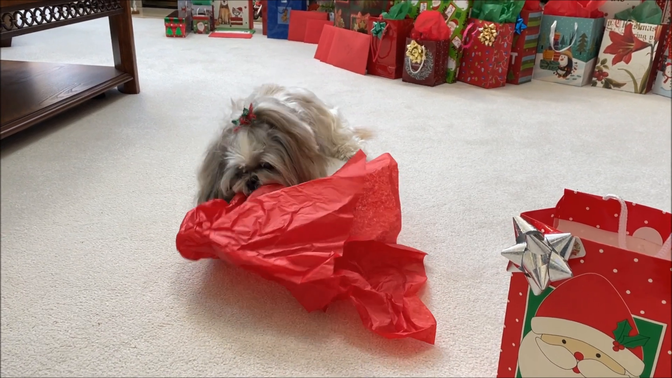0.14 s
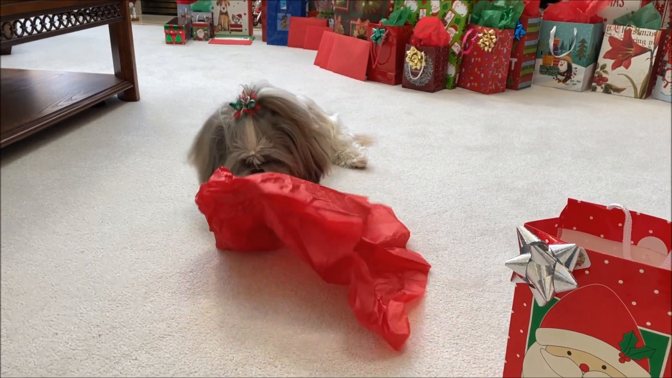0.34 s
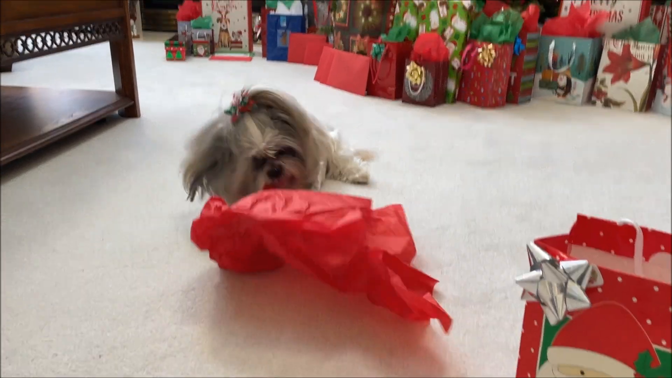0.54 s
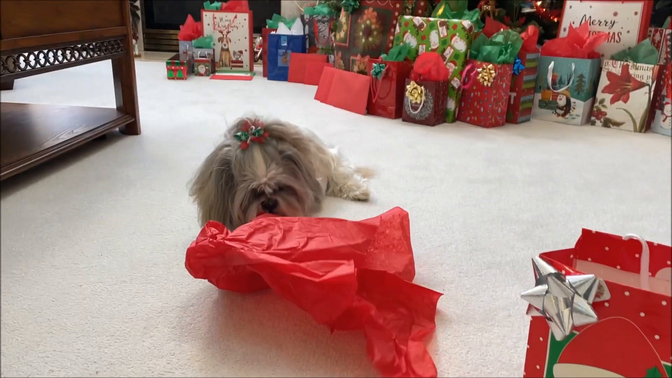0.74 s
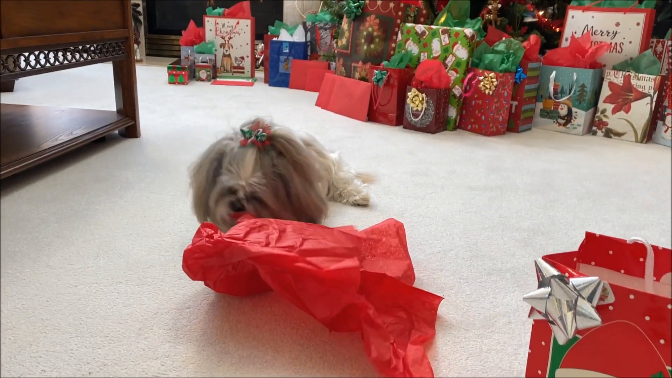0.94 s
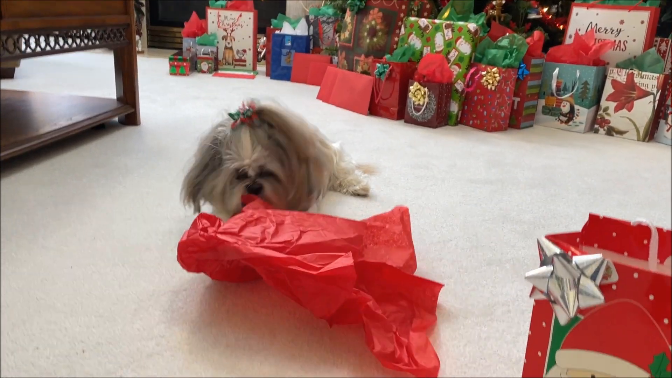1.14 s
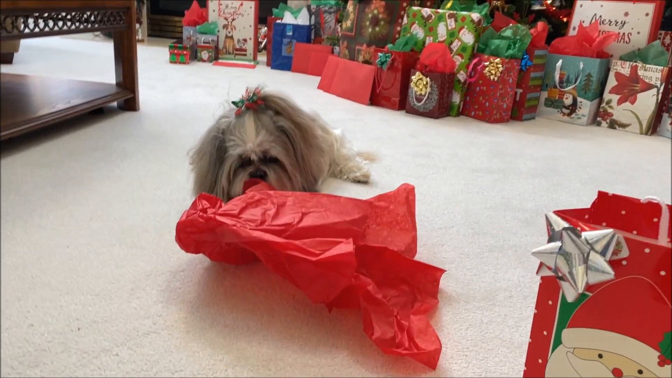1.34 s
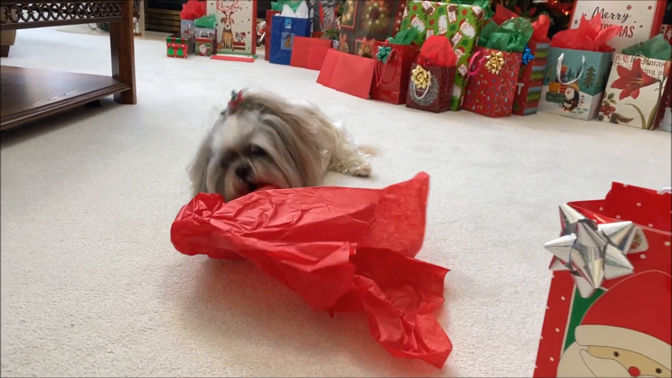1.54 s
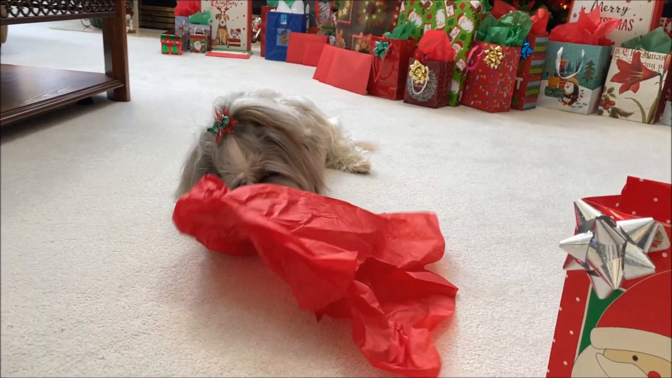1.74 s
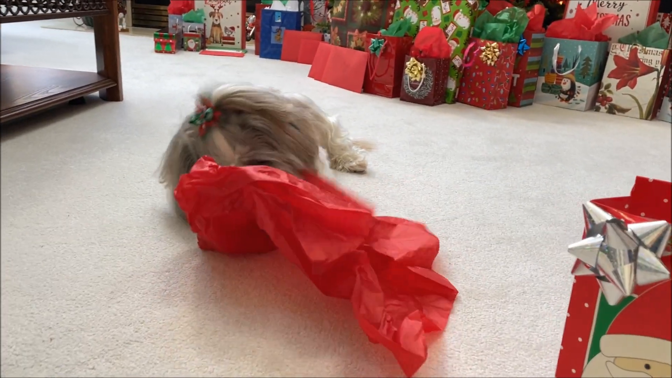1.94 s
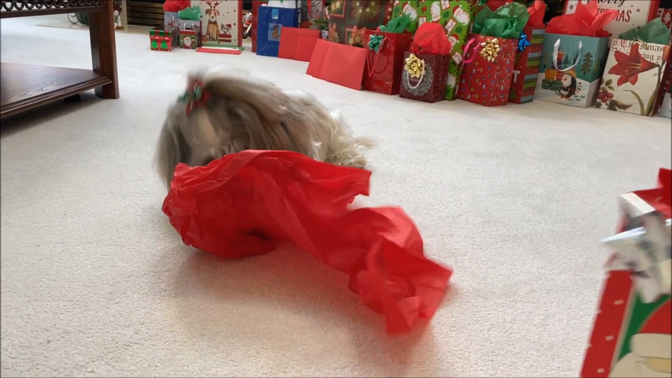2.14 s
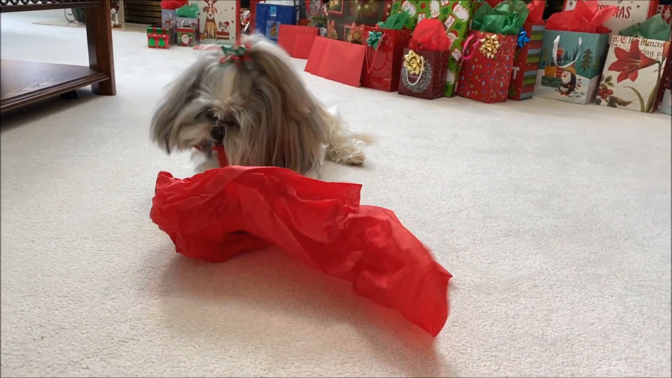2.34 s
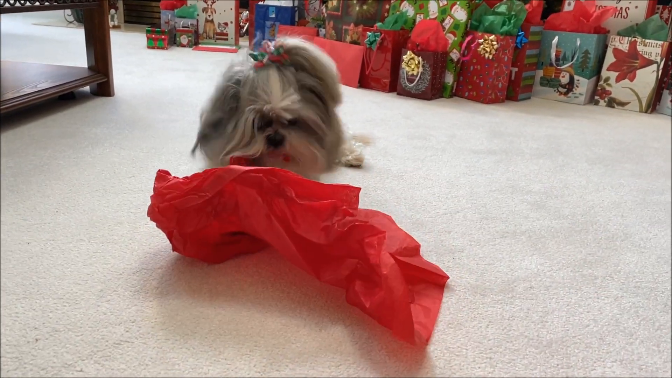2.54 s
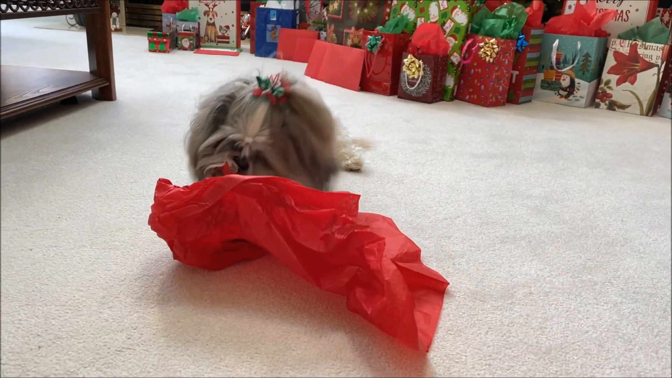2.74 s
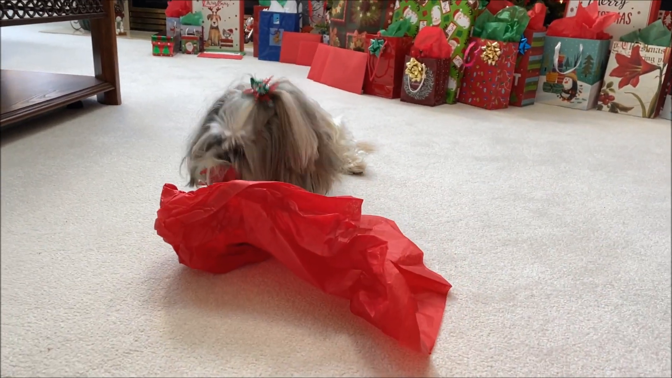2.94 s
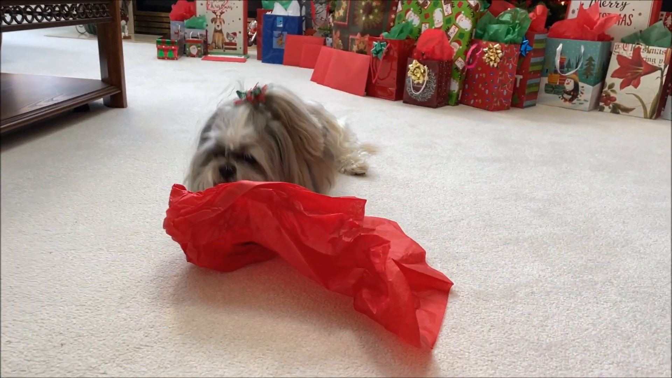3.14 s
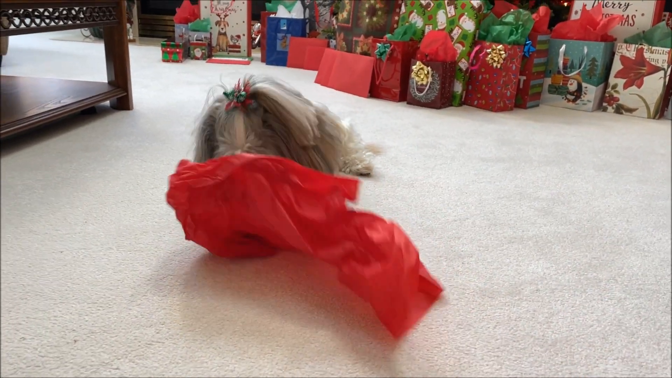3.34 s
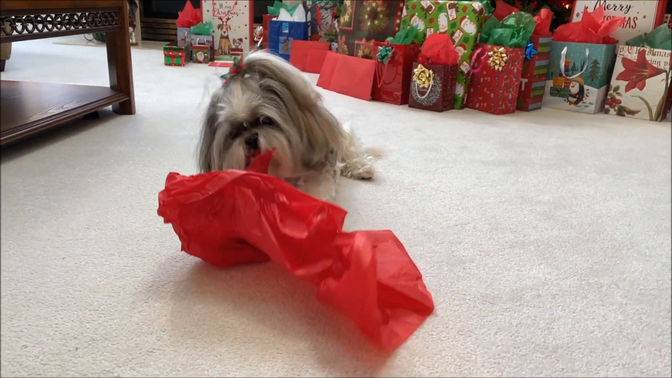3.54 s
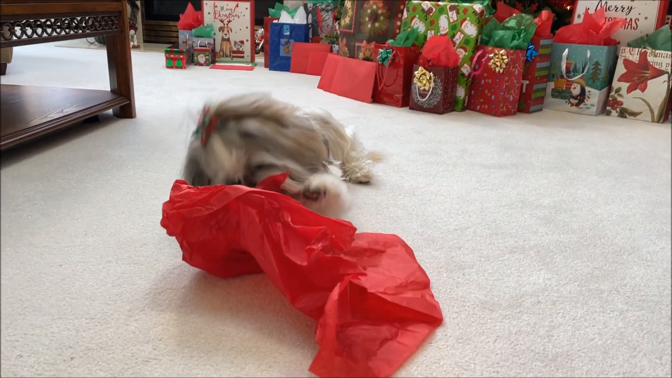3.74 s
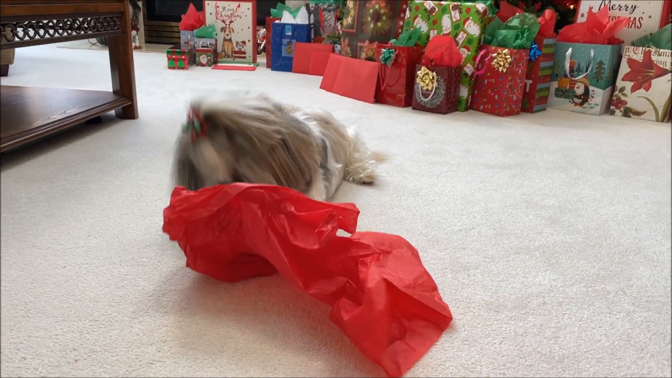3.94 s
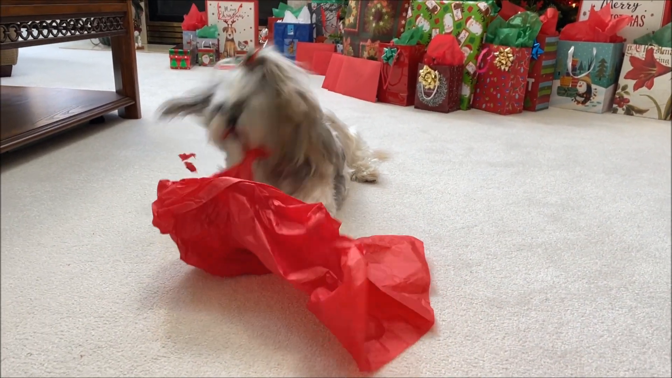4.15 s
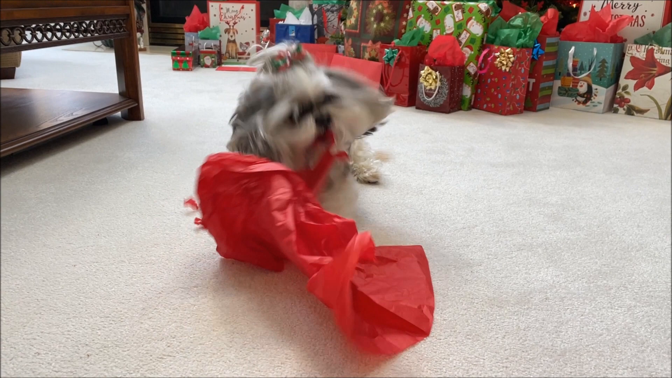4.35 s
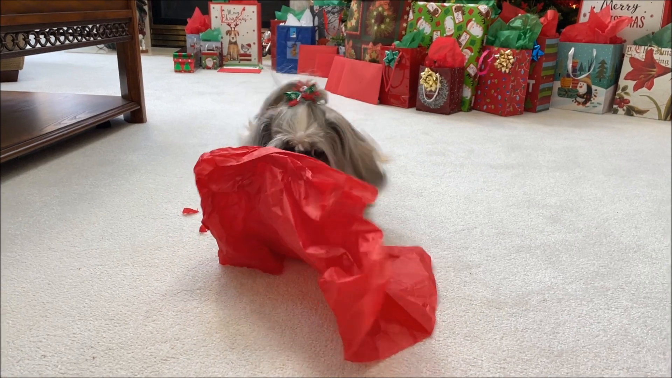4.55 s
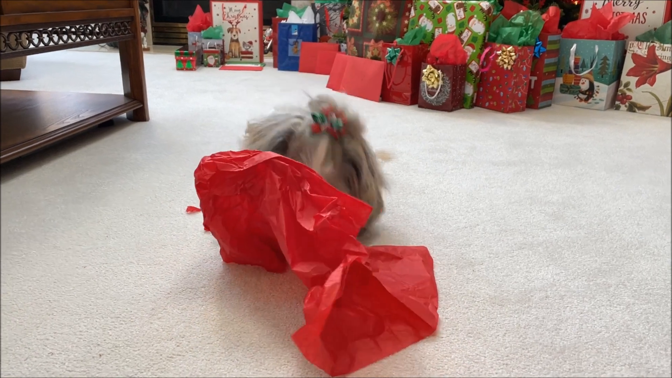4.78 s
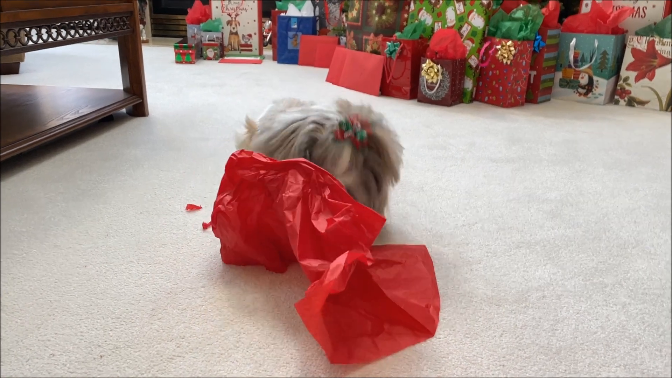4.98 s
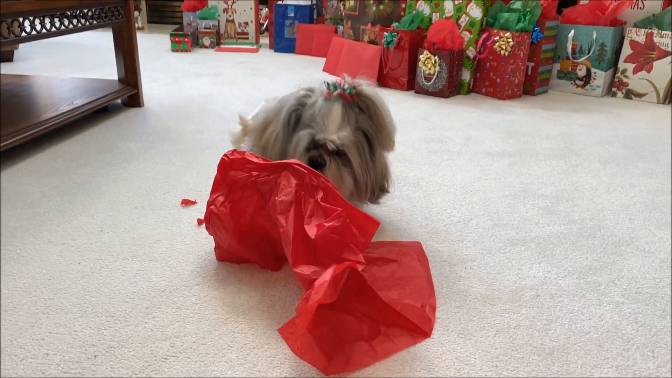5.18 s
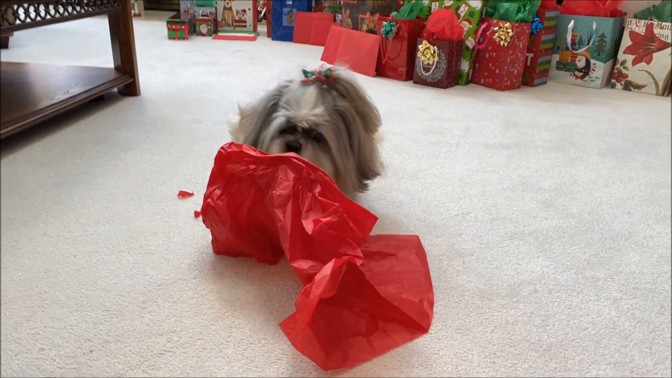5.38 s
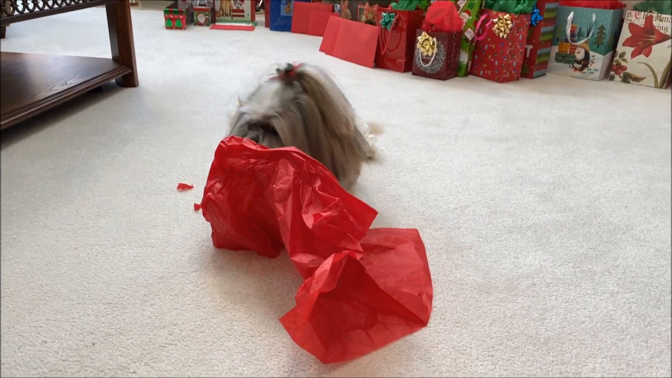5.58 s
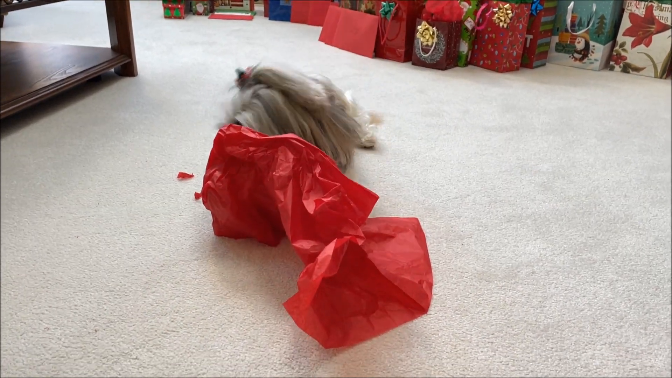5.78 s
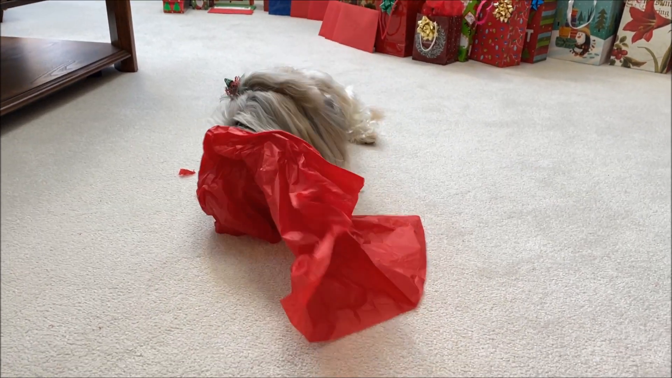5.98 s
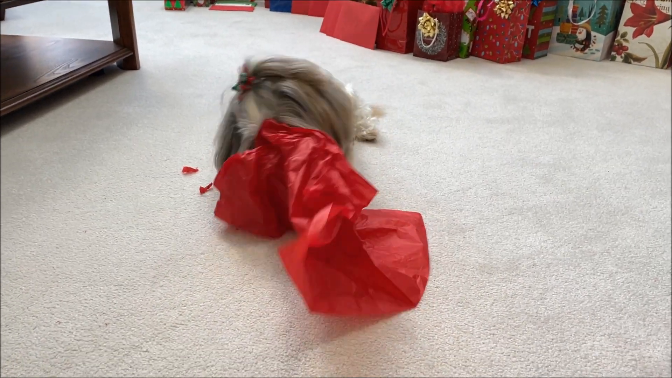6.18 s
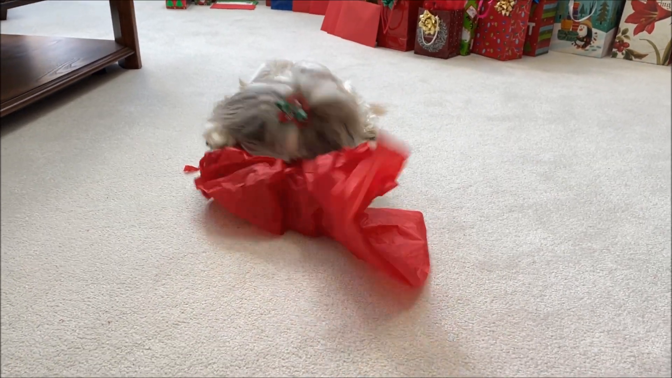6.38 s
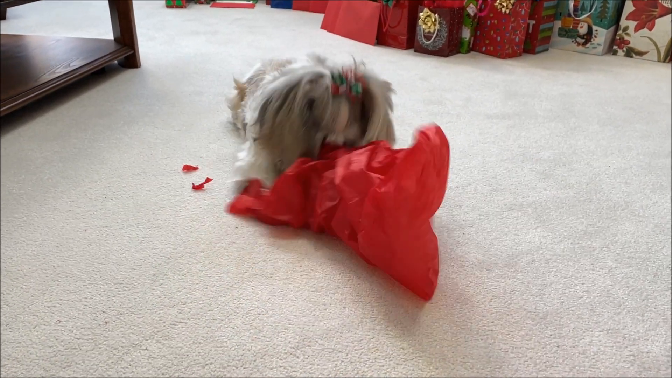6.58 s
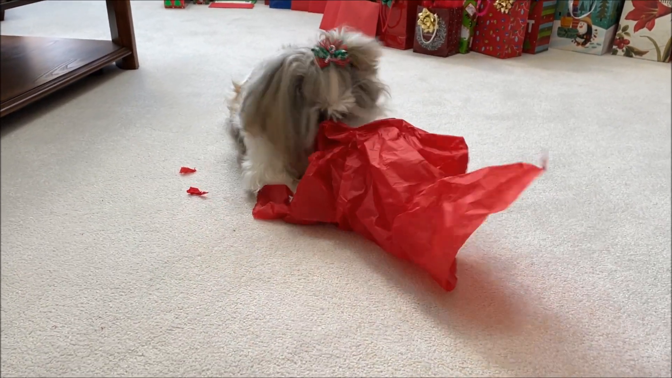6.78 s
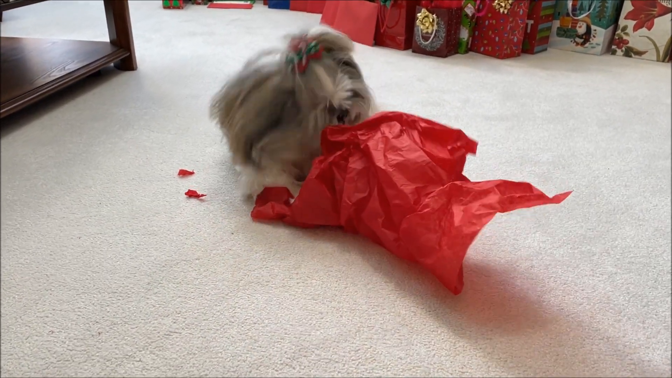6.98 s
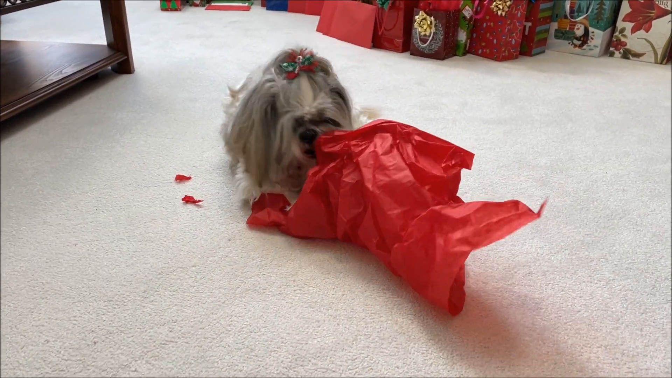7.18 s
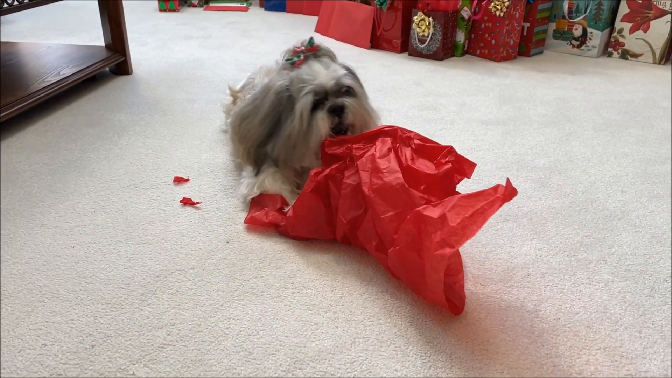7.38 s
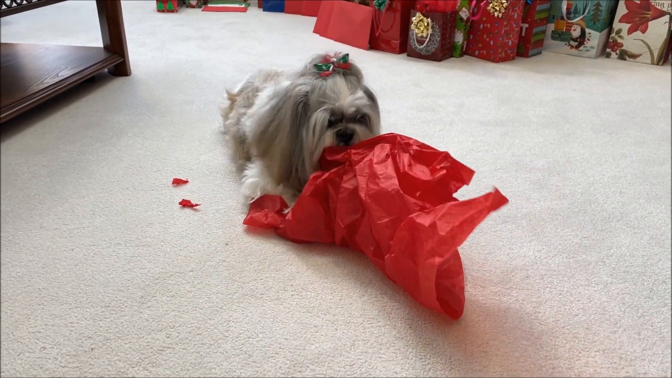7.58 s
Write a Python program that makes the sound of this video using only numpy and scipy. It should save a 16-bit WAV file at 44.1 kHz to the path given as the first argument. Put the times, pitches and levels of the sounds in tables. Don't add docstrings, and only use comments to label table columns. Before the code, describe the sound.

Close by in a quiet carpeted room, a small dog worries a sheet of tissue paper. Light rustling and ticking creases give way to sharp crackling yanks with short pauses, then a hard dull thump on the floor and smaller knocks. The strongest tearing comes past the middle and again near the end. A handheld stereo microphone picks up faint low hum and room rumble beneath, paper leaning to the left.

```python
import sys
import numpy as np
from scipy import signal
from scipy.fft import rfft, irfft, next_fast_len
from scipy.io import wavfile

SR = 44100
rng = np.random.default_rng(int(sys.argv[2]) if len(sys.argv) > 2 else 0)


def dump_mix(stems):
    frames = np.atleast_2d(stems).T
    limited = np.clip(frames, -1, 1)
    pcm = np.round(limited * 32767).astype(np.int16)
    wavfile.write(sys.argv[1], SR, pcm)


def level_to_linear(level):
    exponent = np.asarray(level, float) / 20
    return 10 ** exponent


N = 336042
PAD = next_fast_len(N + SR)
HZ = np.maximum(np.fft.rfftfreq(PAD, 1 / SR), 1)
COARSE_S = np.arange(0, N + 64, 64) / SR

# pitch_hz, density_db (per Hz)
RUMBLE = [(12, -31), (20, -2), (116, 7), (167, -4.5), (221, -5), (419, -26), (693, -57), (1840, -22),
          (2880, -50), (3220, -29.5), (7650, -40), (14500, -35), (15800, -54)]
RUMBLE_DB = -63.5
# pitch_hz, level_db (rms)
HUM = [(59.5, -73.5), (119, -73), (183, -84), (301, -85)]

# pitch_hz, left_lead_rad
PORT_PHASE = [(0, 0), (1500, 0), (2300, 1.1), (3700, 1.9), (4700, 1.5), (5400, -.3), (6300, -1.4),
              (7700, -2.1), (8600, -3.14), (9600, -4.2), (11500, -4.9), (13000, -6.0), (14000, -6.28),
              (16000, -6.5)]
# pitch_hz, left_minus_right_db
PORT_BALANCE = [(100, -2.5), (900, -3), (2200, -6), (4000, -0.5), (5300, -2), (7000, -6.5), (9000, -4),
                (16000, -4.5)]
# pitch_hz, reflected_re_direct_db
DIFFUSE = [(60, -8), (600, -4), (2000, 0), (3500, -7.5), (5200, 2.5), (7400, -14), (8600, -9),
           (11000, -4.5), (14000, -11.5), (15700, 0.5)]
ROOM_T60_S = .2

# start_s, crinkle_db, rise_s (last 20 dB), hold_s, fall_s (20 dB)
RUSTLES = [(0.0, -73.2, 0.1, 0.067, 0.207), (0.16, -58.4, 0.062, 0.106, 0.174),
           (0.523, -62.0, 0.591, 0.067, 0.454), (0.95, -71.9, 0.153, 0.073, 0.054),
           (1.095, -68.9, 0.072, 0.12, 0.33), (1.611, -66.6, 0.13, 0.077, 0.163),
           (1.645, -60.7, 0.036, 0.18, 0.113), (2.284, -56.7, 0.108, 0.178, 0.105),
           (2.505, -69.3, 0.127, 0.329, 0.2), (3.016, -75.4, 0.03, 0.059, 0.311),
           (3.228, -64.6, 0.03, 0.102, 0.101), (3.448, -54.0, 0.099, 0.146, 0.218),
           (3.765, -61.4, 0.055, 0.189, 0.088), (4.051, -61.8, 0.039, 0.005, 0.162),
           (4.448, -51.3, 0.042, 0.049, 0.412), (4.921, -59.8, 0.087, 0.095, 0.154),
           (5.253, -72.6, 0.4, 0.125, 0.064), (5.465, -80.3, 0.08, 0.19, 0.625),
           (5.932, -69.7, 0.291, 0.101, 0.147), (6.261, -53.9, 0.256, 0.13, 0.086),
           (6.459, -50.4, 0.234, 0.09, 0.272), (6.719, -49.8, 0.098, 0.088, 0.097),
           (7.29, -65.6, 0.125, 0.047, 0.511), (7.63, -65.4, 0.103, 0.1, 0.1)]
# peak_s, crinkle_db, rise_s (20 dB), fall_s (20 dB), hollow_re_crinkle_db
YANKS = [(0.43, -47.2, 0.135, 0.172, 0.0), (0.527, -53.3, 0.136, 0.037, 5.0),
         (1.873, -64.5, 0.036, 0.339, -4.0), (1.983, -54.2, 0.226, 0.174, 1.0),
         (2.123, -51.5, 0.072, 0.301, -0.0), (2.259, -42.6, 0.038, 0.12, 2.0),
         (2.37, -50.2, 0.04, 0.039, 6.0), (2.455, -44.6, 0.079, 0.02, -5.0),
         (3.316, -57.2, 0.02, 0.088, 9.0), (3.408, -53.9, 0.082, 0.082, 1.0),
         (3.63, -47.5, 0.209, 0.191, 1.0), (4.013, -47.1, 0.039, 0.043, 3.0),
         (4.18, -45.3, 0.14, 0.124, 1.0), (4.349, -37.9, 0.071, 0.094, 1.0),
         (4.717, -51.8, 0.107, 0.115, -2.0), (5.049, -44.1, 0.078, 0.146, -3.0),
         (5.082, -44.3, 0.095, 0.127, -1.0), (6.116, -48.6, 0.051, 0.058, 11.0),
         (6.652, -40.6, 0.072, 0.11, 6.0), (6.85, -46.8, 0.028, 0.064, 1.0),
         (6.942, -49.9, 0.06, 0.185, 5.0), (7.0, -47.0, 0.057, 0.154, 6.0),
         (7.064, -47.5, 0.284, 0.105, 4.0), (7.241, -56.0, 0.222, 0.116, -1.0)]
# time_s, left_minus_right_db, bunch_db (bunched up: more flap, less sizzle)
PLACE = [(0, 4.5, -2), (.4, 4.5, .5), (.9, 5, 0), (1.8, 6, 0), (2.2, 6, 2.5), (2.6, 6, 1), (3.05, 6, -4),
         (3.4, 6, 0), (4.3, 6, -1), (4.8, 3, 2), (5.2, 4.5, 3), (5.8, 5.5, 3), (6.4, 5.5, 0.3),
         (7.0, 4.5, 0.6), (7.62, 4.5, 3)]
# pitch_hz, density_db (per Hz)
CRINKLE = [(35, -16), (70, 6.5), (150, 7.5), (400, 6.5), (1500, -1), (2200, 0), (4000, -1.5), (5600, -4),
           (7000, -3), (8500, 3), (10500, -3), (12000, -4.5), (15500, -8.5)]
FLAP_DB, FLAP_PER_DB, FLAP_WANDER_DB = -1.7, -.04, .9
SIZZLE_DB, SIZZLE_PER_DB, SIZZLE_WANDER_DB = .3, .03, .8
SIZZLE_PER_BUNCH = -.6
RUSTLE_HOLLOW_DB, FOLDING_DB_PER_S = -1.5, .95
SHAKE_DB, SHAKE_FADE_S = -27, .09

# start_s, peak_db, pitch_hz, crack_re_peak_db
SNAPS = [(0.0322, -53, 2480, -15), (0.4414, -34, 5140, -4), (0.4147, -31, 4060, -13.5),
         (0.8132, -50, 6000, -12), (0.838, -59, 2360, 2), (6.994, -36, 1830, -11), (0.952, -51, 2200, -8),
         (7.0441, -35, 1930, -14), (1.1997, -56, 2030, -10), (1.3149, -54, 2100, -6),
         (1.3673, -55, 2380, -5), (1.505, -64, 2390, -4), (1.6106, -52, 2260, -9), (1.8724, -42, 2750, -5),
         (2.6025, -48, 2190, -9.5), (2.67, -58, 2940, 0), (2.703, -56, 2760, -11), (2.7595, -51, 1520, -10),
         (2.9158, -54, 7400, -23), (3.018, -57, 4130, -5), (3.0743, -53, 7000, -8),
         (3.2131, -58, 3220, -10), (5.3428, -50, 4730, -13), (5.502, -63, 4030, -3), (5.7109, -57, 2070, 0),
         (5.8374, -57, 1900, -10), (5.916, -52, 1930, -8), (5.98, -54, 2020, -11), (6.0805, -48, 2020, -11),
         (7.436, -54, 5040, -5)]
CREASES_PER_S, CREASE_DB, CREASE_SPREAD_DB, CREASE_HZ = 30, 9.0, 2.5, 2200

# start_s, knock_peak_db, boom_re_knock_db, contact_ms, boom_hz (sunk pitch)
THUMPS = [(0.416, -45, -6, 4.1, 232), (0.523, -40, -16, 5.2, 203), (1.978, -48, 3, 3.0, 198),
          (2.269, -46, -21, 4.3, 127), (2.368, -21.5, -42, 4.3, 146), (2.393, -36, -9, 2.5, 88.8),
          (2.428, -29.5, -20, 3.0, 151), (2.45, -15, -13.5, 1.4, 113), (2.605, -43.5, -1, 4.2, 102),
          (2.773, -27.5, -11.5, 3.4, 192), (2.803, -37, -9, 3.4, 158), (2.835, -50, -10, 3.0, 112),
          (4.716, -47, 5, 3.5, 93), (6.662, -32, -13, 2.6, 210), (6.861, -45, -8, 2.6, 135),
          (7.281, -51.5, 2, 2.5, 83.4)]
# start_s, knock_peak_db, boom_re_knock_db, contact_ms, boom_hz (sunk pitch)
FLOPS = [(4.004, -54, 15, 1.9, 84), (0.45, -51, 9, 3.0, 85), (1.585, -58, 3, 3.0, 150),
         (4.13, -55, 4, 3.4, 220), (5.475, -51, -9, 5.3, 151)]
# pitch_hz, level_db, t60_s
KNOCK = [(1210, 18, 0.0078), (1010, -1, 0.022), (680, 7, 0.03), (470, -18, 0.026)]
# pitch_hz, level_db, t60_s
BOOM = [(327, 0, 0.012), (186, -25, .05), (101.7, 1, 0.21)]
BOOM_T60_S = .08
THUMP_SINK_MS, FLOP_SINK_MS = 4.6, 14

# start_s, end_s, corner_hz
MONO_TOP = [(0.60, 0.80, 7600), (1.22, 1.31, 6000), (2.78, 2.91, 5800), (2.94, 3.03, 5800),
            (4.21, 4.26, 7000), (4.56, 5.47, 5100), (7.17, 7.42, 7000)]
WEAK_DB = -9


def rms_one(x):
    return x / np.sqrt(np.mean(x ** 2) + 1e-20)


def in_time(rows):
    s, *columns = np.transpose(rows)
    return [np.interp(np.arange(N) / SR, s, c) for c in columns]


def on_grid(points):
    hz, db = np.array(points).T
    return np.interp(np.log(HZ), np.log(np.maximum(hz, 1)), db)


def shaped(x, response):
    return irfft(rfft(x, PAD) * response, PAD)[..., :N]


def drift(rate):
    r = np.exp(-80 * np.pi * rate / SR)
    slow = signal.lfilter([1], [1, -2 * r, r * r], rng.standard_normal(N // 40 + 2002))[2000:]
    return np.interp(np.arange(N) / 40, np.arange(len(slow)), rms_one(slow))


def ring(clicks, hz, t60):
    r, w = level_to_linear(-60 / (t60 * SR)), 2 * np.pi * hz / SR
    return signal.lfilter([0, np.sin(w)], [1, -2 * r * np.cos(w), r * r], clicks + 1e-18)


def ports(pair, wet_db):
    t = np.arange(SR // 2) / SR
    echoes = rng.standard_normal((2, len(t))) * level_to_linear(-60 * t / ROOM_T60_S) * (t > .002)
    echoes = rfft(echoes / np.sqrt(np.sum(echoes ** 2, axis=1, keepdims=True)), PAD)
    side = np.array([[.5], [-.5]])
    direct = np.exp(1j * side * np.interp(HZ, *np.transpose(PORT_PHASE)))
    wet = level_to_linear(on_grid(DIFFUSE) + wet_db)
    heard = (direct + wet * echoes) / np.sqrt(1 + wet ** 2)
    return shaped(pair, level_to_linear(side * on_grid(PORT_BALANCE)) * heard)


def room_tone():
    spread = np.array([HZ ** 0, np.clip(HZ / 900, .2, .5)])
    near, far = shaped(rng.standard_normal((2, N)), level_to_linear(on_grid(RUMBLE)) * spread)
    noise = level_to_linear(RUMBLE_DB - 4.0) * ports(np.array([near + far, near - far]), wet_db=0) / np.std(near)
    t = np.arange(N) / SR
    hum = sum(level_to_linear(db + 5 + 2.3 * drift(2)) * np.sin(2 * np.pi * hz * t + 0.53 * drift(2.2)) for hz, db in HUM)
    return noise + hum


def swell(s, peak_db, rise_s, hold_s, fall_s):
    t = COARSE_S - s
    away = np.maximum(-t / rise_s, (t - hold_s) / fall_s)
    return level_to_linear(2 * peak_db - 40 * np.maximum(away, 0))


def pull(bunch_db):
    rustle = sum(swell(*row) for row in RUSTLES)
    yanks = [swell(s, db, rise_s, 0, fall_s) for s, db, rise_s, fall_s, hollow_db in YANKS]
    power = rustle + sum(yanks)
    hollow = rustle * level_to_linear(2 * (RUSTLE_HOLLOW_DB + FOLDING_DB_PER_S * COARSE_S))
    hollow = hollow + sum(yank * level_to_linear(2 * row[-1]) for yank, row in zip(yanks, YANKS))
    shake = sum(swell(s, db + max(boom_db, 0) + SHAKE_DB, .008, 0, SHAKE_FADE_S)
                for s, db, boom_db, *rest in THUMPS + FLOPS)
    curves = [COARSE_S, 10 * np.log10(power), 10 * np.log10(hollow / power), shake / power]
    crinkle_db, hollow_db, shake = in_time(np.transpose(curves))
    effort_db = crinkle_db + 55
    flap_db = FLAP_DB + FLAP_PER_DB * effort_db + bunch_db + FLAP_WANDER_DB * drift(5.0)
    flap = level_to_linear(2 * flap_db) + shake
    sizzle_db = SIZZLE_DB + SIZZLE_PER_DB * effort_db + SIZZLE_PER_BUNCH * bunch_db
    sizzle_db = sizzle_db + SIZZLE_WANDER_DB * drift(6.0)
    return crinkle_db, 10 * np.log10(flap), sizzle_db, hollow_db


def crinkle(crinkle_db, flap_db, sizzle_db, hollow_db, busy=5500, spread_db=3.0, clump_db=1.5):
    chance = np.clip(busy * level_to_linear(.6 * (crinkle_db + 50)) / SR, .012, .6)
    sizes = level_to_linear(spread_db * np.minimum(rng.exponential(1, N), 4.2)) * rng.choice([-1, 1], N)
    clumps = level_to_linear(clump_db * drift(27) + 1.3 * drift(6.7))
    clicks = sizes * (rng.random(N) < chance) * clumps / np.sqrt(chance)
    pitches, dealt = np.geomspace(600, 13000, 6), rng.integers(0, 12, N)
    facets = sum(rms_one(ring(clicks * (dealt == k), hz, 4.8 / hz)) * np.sqrt(hz / 14000)
                 for k, hz in enumerate(pitches))
    sheet = rms_one(clicks * (dealt >= 6)) + 0.75 * rms_one(facets)
    low, high = 1 / (1 + (HZ / 1500) ** 4), 1 / (1 + (9000 / HZ) ** 6)
    hollow = 1 / (1 + ((HZ - 2000) / 250) ** 2)
    bands = np.array([(1 - low) * (1 - high) * (1 - hollow), low, high, hollow])
    parts = shaped(sheet, level_to_linear(on_grid(CRINKLE)) * bands)
    gains = [1, level_to_linear(flap_db - 6.5), level_to_linear(sizzle_db - 0.5), level_to_linear(hollow_db - 12.7)]
    return level_to_linear(crinkle_db) * sum(gain * rms_one(part) for gain, part in zip(gains, parts))


def snaps(rows):
    out, t = np.zeros(N), np.arange(800) / SR
    for (s, peak_db, hz, crack_db), noise in zip(rows, rng.standard_normal((len(rows), 800))):
        tick = noise * (np.exp(-t / .0009) + .3 * np.exp(-t / .006))
        body = .35 * rms_one(tick) + rms_one(ring(tick, hz, 4 / hz))
        crack = np.diff(tick, prepend=0)
        snap = body / abs(body).max() + level_to_linear(crack_db + 11) * crack / abs(crack).max()
        at = round(s * SR)
        out[at:at + 800] += level_to_linear(peak_db + 4) * snap[:N - at]
    return out


def creases(crinkle_db):
    when, size, pitch, crack = rng.random((int(CREASES_PER_S * N / SR), 4)).T
    at = (when * (N - 1)).astype(int)
    peak_db = crinkle_db[at] + CREASE_DB - CREASE_SPREAD_DB * np.log(size + .05)
    return list(zip(at / SR, peak_db, CREASE_HZ * (.8 + 2.0 * pitch ** 3), -14 + 10.5 * crack))


def thumps():
    out, t = np.zeros((2, N)), np.arange(5000) / SR
    rows = [(*row, THUMP_SINK_MS) for row in THUMPS] + [(*row, FLOP_SINK_MS) for row in FLOPS]
    noises = rng.standard_normal((len(rows), 5000))
    for (s, peak_db, boom_db, ms, boom_hz, sink_ms), noise in zip(rows, noises):
        press = np.exp(-t * 1000 / max(ms, .3)) + 0.02 * np.exp(-t / 0.041)
        contact = noise * press * np.minimum(t / 0.00056, 1)
        knock = sum(level_to_linear(db) * ring(contact, hz, t60) for hz, db, t60 in KNOCK)
        knock = signal.sosfilt(signal.butter(6, 1550, fs=SR, output="sos"), knock)
        sunk = 1 - np.exp(-t * 1000 / sink_ms)
        boom = np.sin(2 * np.pi * np.cumsum(boom_hz + 600 * (1 - sunk)) / SR)
        boom *= sunk * level_to_linear(-60 * np.maximum(t - sink_ms / 450, 0) / BOOM_T60_S)
        boom += 0.13 * sum(level_to_linear(db) * rms_one(ring(contact, hz, t60)) for hz, db, t60 in BOOM)
        boom = signal.sosfilt(signal.butter(2, 60, "high", fs=SR, output="sos"), boom)
        knock, boom = knock / abs(knock).max(), level_to_linear(boom_db) * boom / abs(boom).max()
        late = np.roll(knock, 8)
        at = round(s * SR)
        out[:, at:at + 5000] += level_to_linear(peak_db) * np.array([level_to_linear(-4.5) * late + boom, level_to_linear(-2.0) * knock + boom])
    return out


def scene():
    pan_db, bunch_db = in_time(PLACE)
    pan_db = pan_db * np.array([[.5], [-.5]])
    crinkle_db, *colour_db = pull(bunch_db)
    tugs_db = 1.4 * drift(30)
    panned = level_to_linear(-.9 + tugs_db + pan_db)
    paper = sum(ports(crinkle(crinkle_db, *colour_db) * panned, wet_db=.1) for region in range(3))
    lone = ports(snaps(SNAPS + creases(crinkle_db)) * level_to_linear(pan_db), wet_db=-8)
    return paper + lone + thumps() + room_tone()


def thrift(mid, side):
    frames = dict(nperseg=2048, noverlap=1024, window="cosine")
    spectra = signal.stft(np.array([mid, side]), **frames)[2]
    bands = spectra[:, :1024].reshape(2, 32, 32, -1)
    power = np.sum(abs(bands) ** 2, axis=2, keepdims=True)
    kept = power > level_to_linear(2 * WEAK_DB) * power[::-1]
    kept[:, :8] = True
    spectra[:, :1024] = (bands * kept).reshape(2, 1024, -1)
    spectra[:, 739:] = 0
    return signal.istft(spectra, **frames)[1][:, :N]


def low_pass(x):
    return signal.sosfilt(signal.butter(12, 16470, fs=SR, output="sos"), x)


def record(dry):
    mid, side = thrift((dry[0] + dry[1]) / 2, (dry[0] - dry[1]) / 2)
    kept = side.copy()
    for start, end, corner_hz in MONO_TOP:
        a, b = round(start * SR), round(end * SR)
        ramp = np.arange(b - a)
        fade = np.clip(np.minimum(ramp, ramp[::-1]) / 500, 0, 1)
        dull = signal.sosfiltfilt(signal.cheby2(8, 40, corner_hz, fs=SR, output="sos"), side[a:b])
        kept[a:b] += fade * (dull - side[a:b])
    return low_pass(np.array([mid + kept, mid - kept]))


dry = scene()
out = record(dry)
dump_mix(out)
```